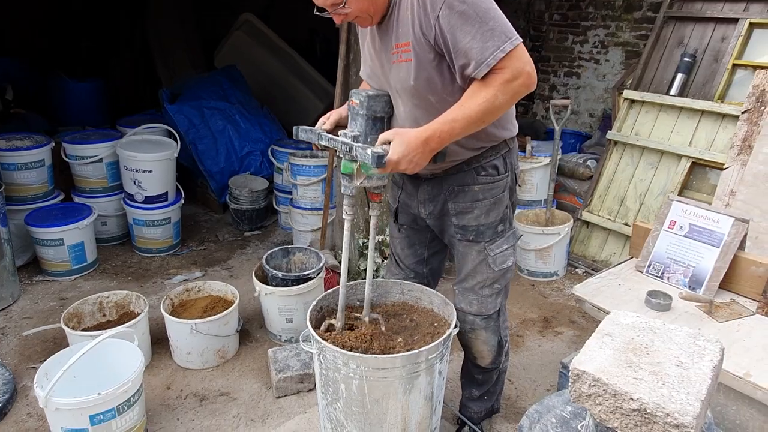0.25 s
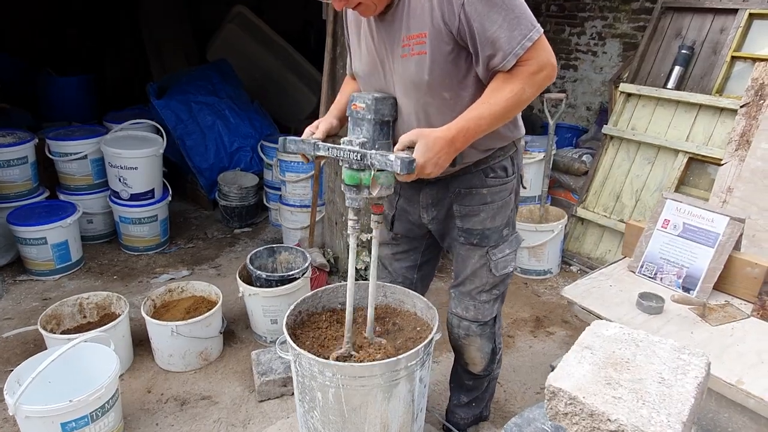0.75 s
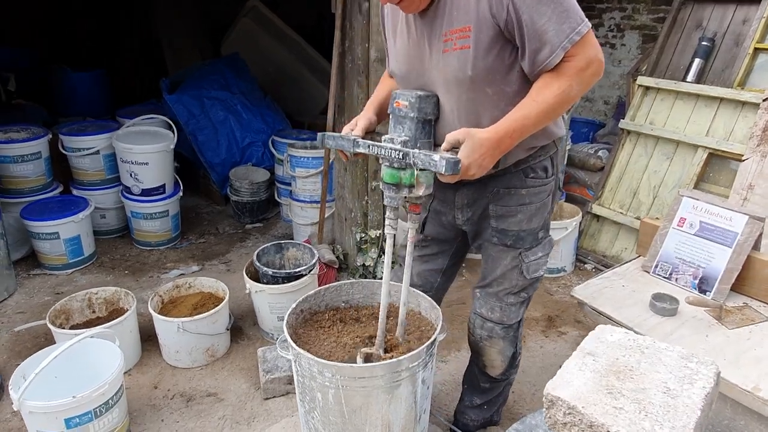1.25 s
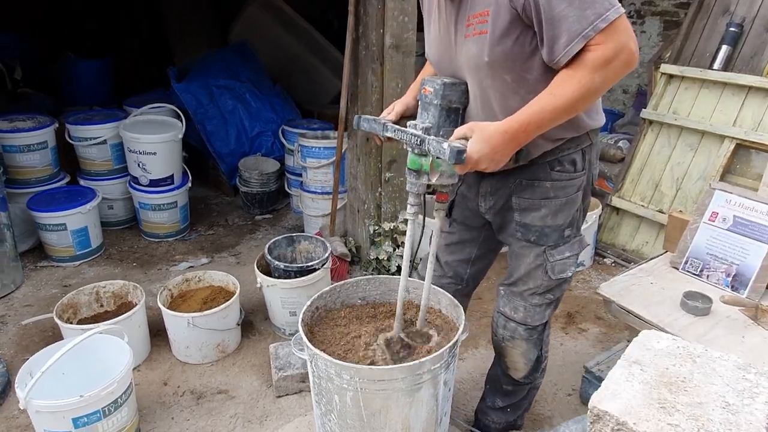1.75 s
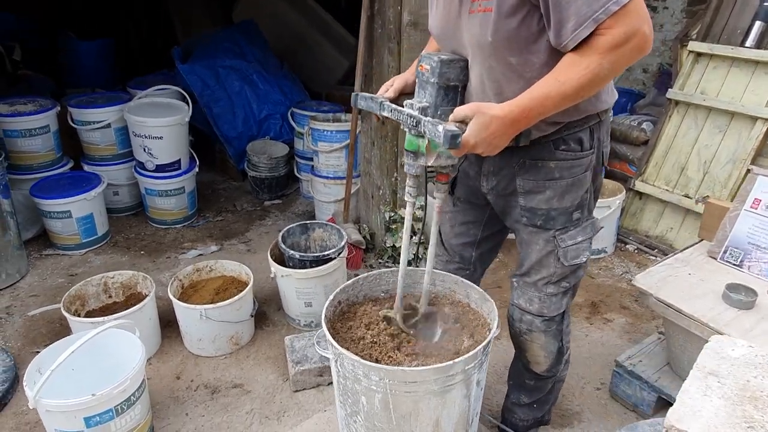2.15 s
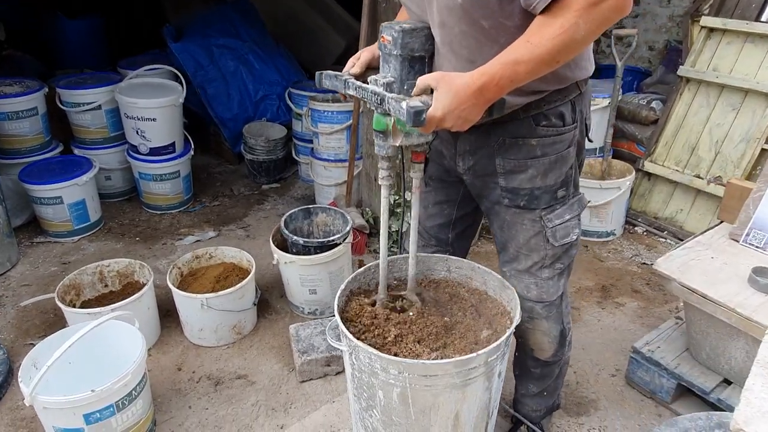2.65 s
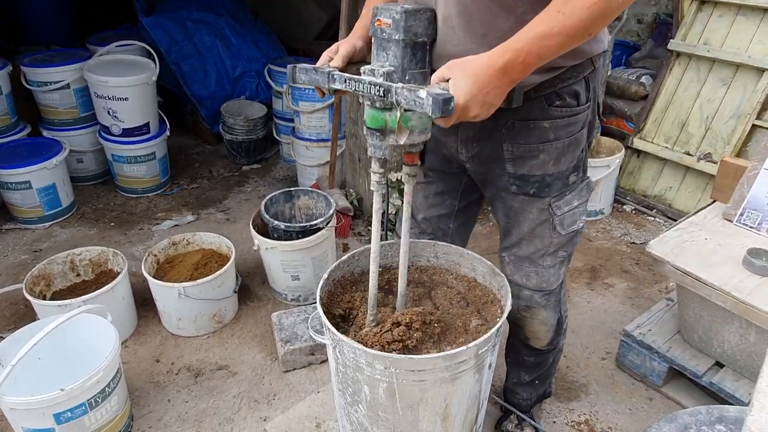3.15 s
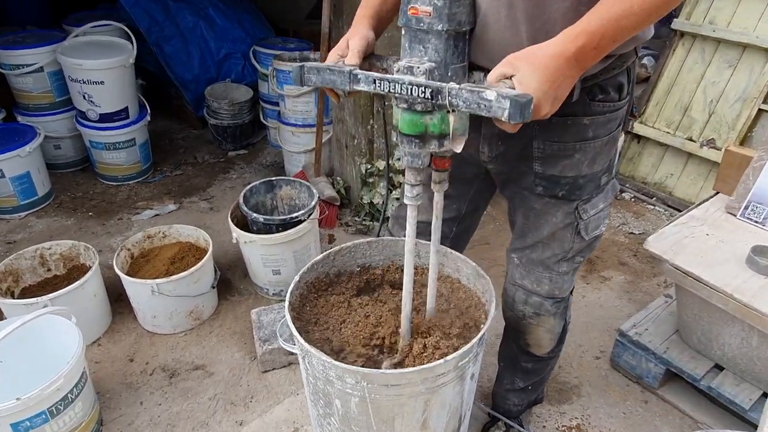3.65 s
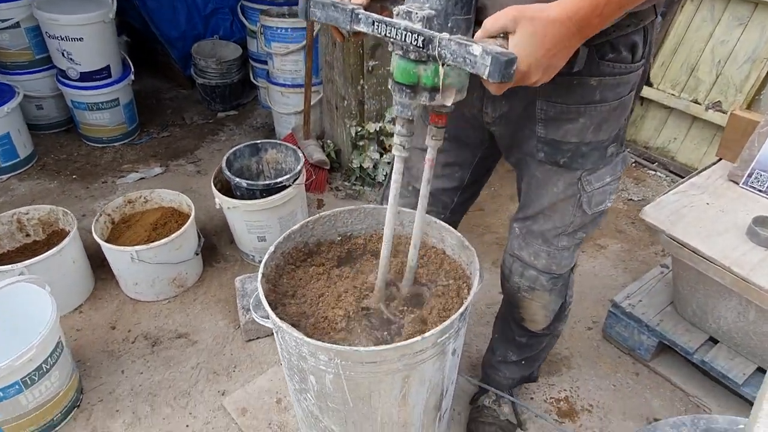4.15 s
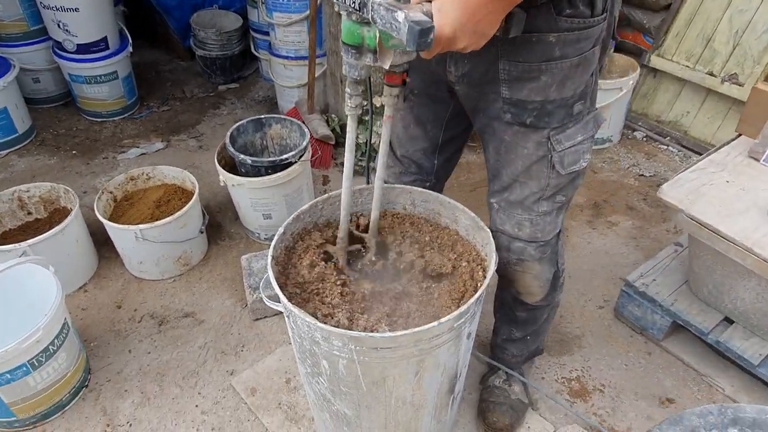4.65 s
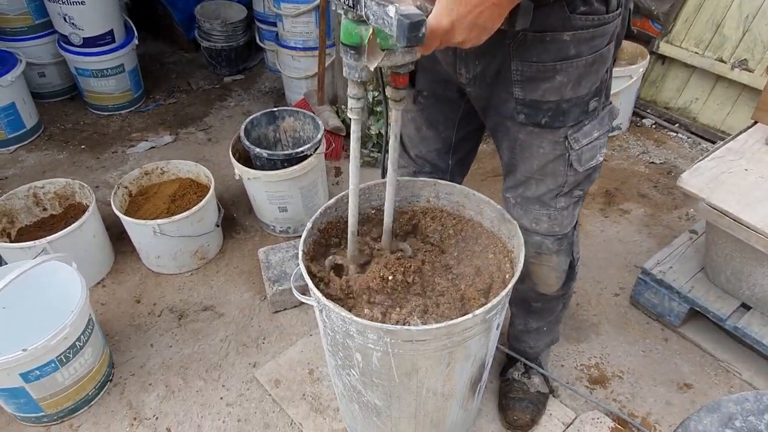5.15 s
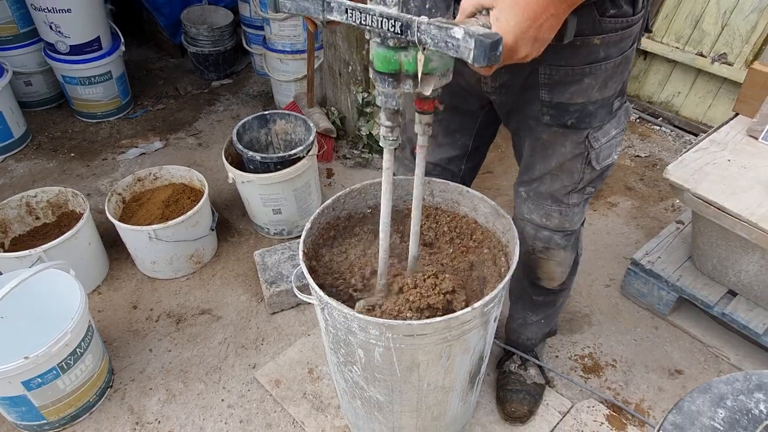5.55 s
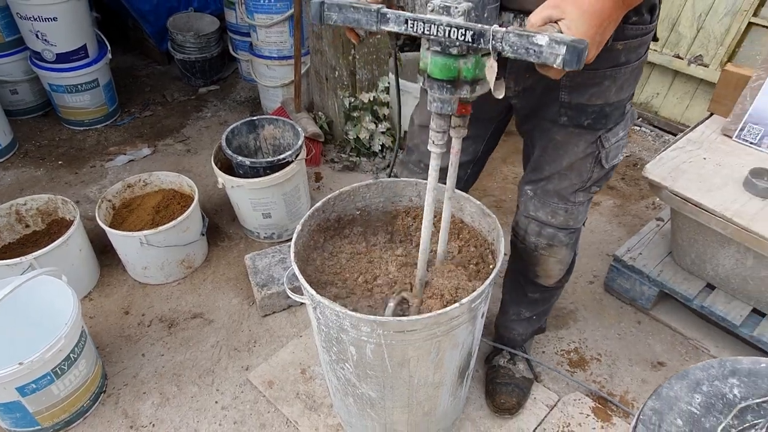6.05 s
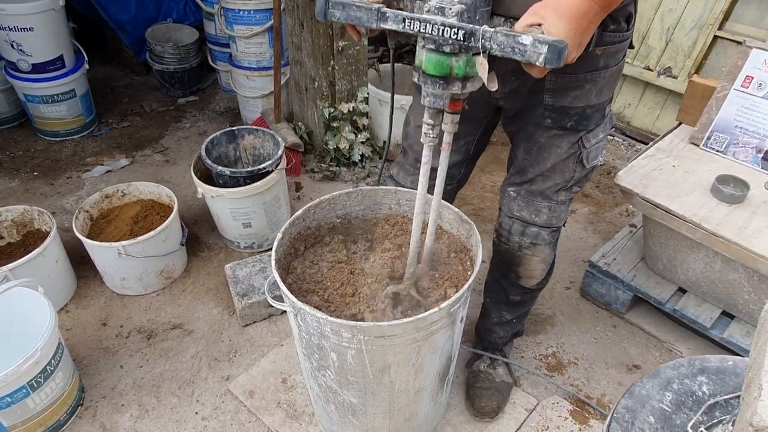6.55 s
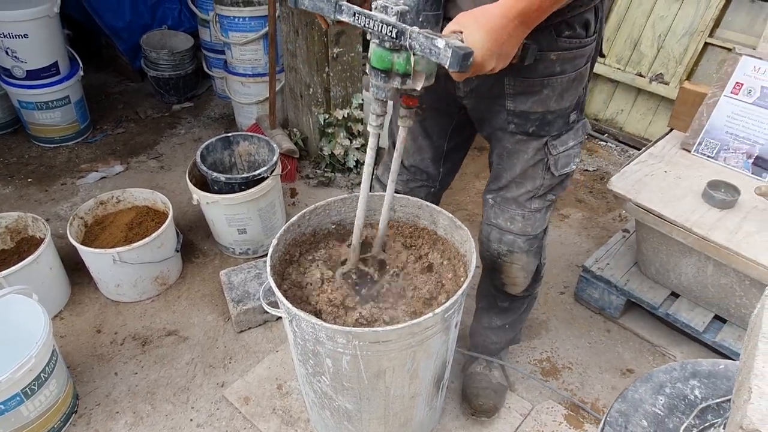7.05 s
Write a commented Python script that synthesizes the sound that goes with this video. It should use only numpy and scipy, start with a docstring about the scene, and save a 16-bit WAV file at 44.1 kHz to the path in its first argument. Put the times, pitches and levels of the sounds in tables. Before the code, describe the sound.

A powerful electric mixer is already running in a metal bin of stiff mortar, close and loud in stereo, with short outdoor reflections. At 0-1.1 s the motor holds a rough, buzzing gear whine around 1 kHz with stronger overtones, while paddles scrape the wall and stones crunch sharply; soft clods thump near 0.3 s. It steps up at about 1.2 s, and the whine swells until 2.3 s as it climbs again to a higher pitch by 2.5 s. Scrapes and crunches return at 2.7-3.7 s. The whine swells again at 3.3-4.8 s over low shoving rumble and wet churning. Gritty scraping and cracks crowd 4.4-5.3 s, with thumps near 5.0 and 5.3 s. A small final rise around 5.4 s settles into a steady whine, fan rush, grinding sand and hiss, with a last scrape at 7.2 s; it ends still running.

```python
"""Mortar mixer in a yard

A twin-paddle electric mixer works stiff mortar in a metal bin, heard in stereo with short echoes around it.
The motor speeds up in steps: its six-tooth pinion whines, fan and brushes rush, the mains make it buzz.
The paddles are led round the bin: on one side the whine swells, on the other they crush grit against
the wall, and in between they shove the wet mass along. Clods thump the bin."""
import sys
import numpy as np
from scipy import signal
from scipy.fft import rfft, irfft, next_fast_len
from scipy.io import wavfile
from scipy.ndimage import uniform_filter1d

SR = 44100
rng = np.random.default_rng(int(sys.argv[2]) if len(sys.argv) > 2 else 0)


def to_wav(s):
    """Save 16-bit WAV."""
    ch = np.atleast_2d(s).T  # columns
    pcm = np.round(np.clip(ch, -1, 1) * 32767)  # PCM
    wavfile.write(sys.argv[1], SR, pcm.astype(np.int16))


N = 321489
TIME = np.arange(N) / SR
FULL_SPEED = 225   # shaft turns per second


def from_db(db):
    """Decibels to amplitude."""
    return 10 ** (np.asarray(db) / 20)


def rms_one(x):
    """Scale to an rms of 1."""
    return x / np.sqrt(np.mean(x ** 2) + 1e-20)


def in_time(rows):
    """The columns of a curve, sample by sample."""
    seconds, *columns = np.transpose(rows)
    return [np.interp(TIME, seconds, column) for column in columns]


def at_hz(points, hz):
    """A spectrum read on a log-frequency axis."""
    f, value = np.transpose(points)
    return np.interp(np.log(hz + 1e-3), np.log(f), value)


def held(start, end, ramp_s):
    """Rise, hold and fall, from 0 to 1 and back."""
    return np.clip(np.minimum(TIME - start, end - TIME) / ramp_s, 0, 1)


def drift(rate):
    """Slow chance with spread 1: white noise smoothed by a double pole, faster for a higher rate."""
    # drawn at every 40th sample, after a run-in of 2000 draws
    pole = np.exp(-80 * np.pi * rate / SR)
    draws = rng.standard_normal(N // 40 + 2002)
    slow = signal.lfilter([1], [1, -2 * pole, pole * pole], draws)[2000:]
    return np.interp(np.arange(N) / 40, np.arange(len(slow)), rms_one(slow))


# Stereo width. Each row: frequency in Hz, side minus mid in dB.
WIDTH = [(60, -33), (110, -27), (200, -56.5), (380, -29), (700, -17), (1290, -8), (2380, -6), (4400, -3.5),
         (8120, -0.5), (15000, 1)]
# Stereo balance. Each row: frequency in Hz, left minus right in dB.
LEAN = [(60, 1), (110, -2.5), (200, -1.5), (380, -0.5), (700, -0.5), (1290, 0), (2380, -1), (4400, -2),
        (8120, -0.5), (15000, 2.5)]


def noise(colour, peaks=(), size=N):
    """Stereo noise of a given colour, narrow in the bass and wide in the treble; rms 1."""
    padded = next_fast_len(size)
    hz = np.arange(padded // 2 + 1) * SR / padded
    level_db = at_hz(colour, hz)
    for f, width, db in peaks:
        level_db = level_db + db / (1 + (2 * (hz - f) / width) ** 2)
    mid, side = rfft(rng.standard_normal((2, padded)))
    signs = np.array([[1], [-1]])
    pair = mid + signs * side * from_db(at_hz(WIDTH, hz))
    pair = pair * from_db(signs * at_hz(LEAN, hz) / 2)
    return rms_one(irfft(pair * from_db(level_db), padded)[:, :size])


def coloured(x, colour):
    """A sound passed through a frequency response."""
    padded = next_fast_len(N + SR // 10)
    hz = np.arange(padded // 2 + 1) * SR / padded
    return irfft(rfft(x, padded) * from_db(at_hz(colour, hz)), padded)[:, :N]


def yard(x):
    """Ground, bin and buckets send back three short echoes, different at each side."""
    out = x.copy()
    for channel in (0, 1):
        lags = (rng.uniform(0.001, 0.0085, 3) * SR).astype(int)
        for lag in lags:
            out[channel, lag:] += x[channel, :-lag] / 4
    return out


def grains(per_s, spread_db):
    """Random clicks of very uneven size and either sign."""
    born = rng.random(N) < per_s / SR
    size_db = spread_db * np.minimum(rng.exponential(1, N), 4)
    return born * from_db(size_db) * rng.choice([-1, 1], N)


def crackle(clicks, colour, t60, tail_db, tail_t60, count=6):
    """Each click lands on one of a few spots; each spot cracks in its own way and echoes in the bin."""
    age = TIME[:SR // 8]
    dealt = rng.integers(0, count, N)
    decay = from_db(-60 * age / t60) + from_db(tail_db - 60 * age / tail_t60)
    spots = [rms_one(noise(colour, size=len(age)) * decay) / np.sqrt(len(age)) for _ in range(count)]
    high_pass = signal.butter(2, 250, "high", fs=SR, output="sos")
    spots = signal.sosfilt(high_pass, spots)
    out = np.zeros((2, N))
    for k, spot in enumerate(spots):
        landed = (clicks * (dealt == k))[None]
        out += signal.oaconvolve(landed, spot, axes=1)[:, :N]
    return out


# Clods that thump the bin. Each row: start in seconds, level in dB before the mode gains, pitch in Hz.
THUMPS = [(0.251, -27.5, 600), (0.317, -28.5, 400), (2.995, -26, 1040), (4.993, -25, 1110),
          (5.015, -27, 256), (5.338, -21.5, 464)]
# Modes of the loaded bin. Each row: frequency in Hz, gain in dB, t60 in seconds.
BIN_MODES = [(214, 10, 0.097), (268, 8, 0.063), (447, 6, 0.037), (543, -13, 0.027), (850, 19, 0.02),
             (1154, 18, 0.033)]


def thumps():
    """Thrown clods set the damped bin ringing, most in the modes near their own pitch."""
    out = np.zeros(N)
    age = TIME[:SR // 8]
    contact = 1 - np.exp(-age / 0.0019)   # wet mortar lands softly
    for s, db, pitch_hz in THUMPS:
        start = int(s * SR)
        for hz, mode_db, t60 in BIN_MODES:
            strength_db = db + mode_db - 7 * abs(np.log2(hz / pitch_hz))   # 7 dB less per octave away
            ring = np.sin(2 * np.pi * (hz * age + rng.random()))
            out[start:start + len(age)] += contact * from_db(strength_db - 60 * age / t60) * ring
    return out


# The paddles shove the mass. Each row: start in seconds, end in seconds, rumble added in dB.
SHOVES = [(0.7, 1.197, -57), (1.75, 2.544, -46.5), (3.177, 3.854, -42), (4.248, 4.9, -44),
          (5.265, 6.25, -43), (6.55, 7.4, -52)]


def shoves():
    """Push of the paddles on the mass: a small steady part, raised during each shove."""
    push = from_db(-47)
    for start, end, db in SHOVES:
        push = push + from_db(db) * held(start, end, ramp_s=0.11)
    return push


# Friction of the sand on the paddles, of which only the swing about its mean counts.
# Each row: time in seconds, level in dB.
FRICTION = [(0.0, -30.5), (0.28, -35.5), (0.99, -33), (1.3, -38), (1.81, -38), (2.39, -30), (3.59, -27.5),
            (4.1, -27), (4.61, -26), (5.14, -31), (5.46, -26.5), (5.83, -23), (6.35, -24), (7.29, -24)]
# Colour of the rumble. Each row: frequency in Hz, level in dB per Hz.
RUMBLE = [(15, -35), (30, -18.5), (55, -7.5), (78, -4), (140, -12.5), (300, -10), (900, -60)]
# Colour of the wet churning. Each row: frequency in Hz, level in dB per Hz.
CHURN = [(90, -54), (150, -4.5), (200, 3.5), (290, -0.5), (470, -5), (590, 8), (720, -0.5), (900, -9.5),
         (1400, 3.5), (4000, -28)]
# Colour of crushed grit and grinding sand. Each row: frequency in Hz, level in dB per Hz.
GRIT = [(200, -57), (700, -9), (1400, -2.5), (2000, 1.5), (2800, 2), (3400, 1.5), (4400, -7.5),
        (6500, -16.5), (8500, -24), (16000, -27)]
# Colour of the sand's hiss. Each row: frequency in Hz, level in dB per Hz.
HISS = [(2500, -50), (5000, 6.5), (7000, 9.5), (8000, 0.5), (10500, 4.5), (12000, -4.5), (14500, -19),
        (15500, -40), (16500, 6.5)]
# levels at mean friction, and the share of its swing that each follows
HISS_DB, HISS_FOLLOWS = -31.5, 0.71
GRIND_DB, GRIND_FOLLOWS, LOAD_ON_GRIND = -32.5, 1.22, 0.1   # last: share of the load's swing
# churning at full speed, its growth with speed, and its change per dB of whine swell
CHURN_DB, CHURN_SPEED_POWER, CHURN_FOLLOWS = -28.5, 2.4, -0.26


def mortar(speed, turns, swell_db, push):
    """The geared-down paddles shove the mix in beats: rumble, wet churning, grinding sand and hiss."""
    friction_db, = in_time(FRICTION)
    friction_db = friction_db - friction_db.mean()
    load_db = 20 * np.log10(push / push.mean())
    beat = np.cos(2 * np.pi * (turns / 17 + 0.28 * drift(3.1)))   # one beat in 17 shaft turns

    rumble = push * from_db(0.5 * drift(10)) * noise(RUMBLE)

    churn_db = CHURN_DB + CHURN_FOLLOWS * swell_db + 1.2 * drift(39) + 1.0 * beat
    churn = from_db(churn_db) * (speed / FULL_SPEED) ** CHURN_SPEED_POWER * noise(CHURN)

    sand = grains(2500 * from_db(3 * beat + 2.7 * drift(20)), spread_db=2.5)
    grind_db = GRIND_DB + GRIND_FOLLOWS * friction_db + LOAD_ON_GRIND * load_db
    grind = from_db(grind_db) * rms_one(crackle(sand, GRIT, t60=0.018, tail_db=-9, tail_t60=0.28))

    angle = 2 * np.pi * turns
    chatter = 1 + 0.067 * np.cos(angle) + 0.11 * np.cos(2 * angle) + 0.14 * np.cos(3 * angle)
    hiss_db = HISS_DB + HISS_FOLLOWS * friction_db + 0.81 * drift(25) + 0.5 * beat
    hiss = from_db(hiss_db) * chatter * yard(noise(HISS))
    return rumble + churn + grind + hiss


# Paddles dragging on the wall. Each row: start in seconds, end in seconds, pressure in dB.
SCRAPES = [(0.0, 0.17, -27), (0.18, 1.255, -32.5), (0.967, 1.004, -29), (2.736, 2.953, -22.5),
           (3.0, 3.748, -30), (3.49, 3.564, -29), (4.363, 4.802, -27.5), (4.82, 4.963, -22.5),
           (5.013, 5.11, -22.5), (5.161, 5.263, -26), (7.235, 7.32, -19.5)]


def scrapes():
    """A paddle drags coarse grit along the wall: clumps of stick-slip cracks while the contact lasts."""
    pressure = sum(from_db(db) * held(start, end, ramp_s=0.016) for start, end, db in SCRAPES)
    cracks = rms_one(grains(700 * from_db(3.5 * drift(30)), spread_db=3.0)) * pressure
    return crackle(cracks, GRIT, t60=0.016, tail_db=-14, tail_t60=0.06)


def small_stones(per_s=6):
    """Lesser stones, caught at random while a paddle is on the wall: rows as for the larger ones."""
    draws = rng.random((100, 4))
    chance = per_s * N / SR / len(draws)
    stones = []
    for when, size, pitch, luck in draws:
        s = when * N / SR
        on_wall = any(start < s < end for start, end, _ in SCRAPES)
        if luck < chance and on_wall:
            level_db = -13.5 + 3 * (2 * size - 1)
            pitch_hz = 2310 * 2 ** (pitch - 0.5)   # within half an octave either way
            stones.append((s, level_db, pitch_hz, -42, 0.0051))
    return stones


# The larger stones crushed by a paddle. Each row: break in seconds, level in dB before BODY_DB,
# pitch in Hz, treble level in dB before EDGE_DB, crumbling time in seconds.
CRUNCHES = [(0.047, -11, 1920, -43, 0.01), (0.1324, -9.5, 1940, -42, 0.011),
            (0.252, -7.5, 2530, -35, 0.011), (0.3727, -12, 2160, -36, 0.011),
            (0.5387, -7.5, 1990, -45, 0.0087), (0.6474, -9.5, 1910, -35, 0.012),
            (0.7864, -7.5, 1970, -36, 0.013), (0.852, -7.5, 2160, -42, 0.014),
            (0.9313, -7, 2790, -38, 0.011), (0.9656, -1, 2680, -42, 0.014), (1.0266, -4, 2420, -36, 0.011),
            (1.0318, -12, 3030, -29, 0.011), (1.0395, -4.5, 3080, -41, 0.011),
            (1.0633, -10, 1940, -36, 0.011), (1.1368, -8, 1980, -37, 0.0084),
            (1.1422, -4, 3280, -38, 0.0057), (2.7329, -8, 2920, -34, 0.011), (2.7807, -9, 2090, -36, 0.011),
            (2.8157, -9, 2550, -39, 0.011), (2.8675, -6, 1920, -36, 0.012), (2.8944, -9, 1850, -33, 0.011),
            (2.9961, -5.5, 1990, -40, 0.011), (3.329, -15, 2530, -24.5, 0.014),
            (3.38, -11.5, 2690, -29, 0.011), (3.499, -6.5, 2520, -28, 0.011),
            (3.5518, -8, 2520, -32, 0.011), (3.702, -3, 2400, -28, 0.0085), (4.7189, -7, 3010, -24, 0.013),
            (4.765, -4.5, 2850, -22, 0.014), (4.845, -7, 3370, -32, 0.013),
            (4.9928, -7.5, 2520, -38, 0.012), (5.0754, -10, 2550, -38, 0.011),
            (5.1687, -7.5, 1910, -38, 0.011), (5.2112, -7, 1980, -30, 0.012),
            (5.788, -4.5, 2640, -35, 0.011), (5.8886, -8.5, 2310, -30, 0.011),
            (5.9394, -7.5, 1900, -32, 0.011), (6.0935, -8, 3510, -29, 0.0087)]
# Colour of a crack's bright edge. Each row: frequency in Hz, level in dB per Hz.
EDGE = [(3000, -8), (5000, 7), (8500, -3), (11000, -5), (16000, -6)]
BODY_DB, EDGE_DB = -7.5, 5   # gains on a stone's two levels


def crunches():
    """A trapped stone grates as the load builds, cracks at its own pitch, and crumbles in smaller cracks."""
    out = np.zeros((2, N))
    age = TIME[:SR // 8] - 0.012   # the grating is heard before the break
    after = np.maximum(age, 0)
    broken = age > 0
    for s, db, hz, treble_db, crumble_s in list(CRUNCHES) + small_stones():
        start = max(int((s + age[0]) * SR), 0)
        chipped = rng.random(len(age)) < 380 / SR
        chips = chipped * rng.uniform(0.22, 1.0, len(age)) * np.exp(-after / crumble_s) * broken
        chips[np.argmax(broken)] = 1   # the main crack
        energy = signal.lfilter([1], [1, -np.exp(-1 / (0.002 * SR))], chips ** 2)
        echo = from_db(-18.0 - 60 * after / 0.14) * broken   # the bin echoes briefly
        grating = 0.21 * np.exp(-abs(age) / 0.0044)   # just before and after the break
        force = np.sqrt(energy) + echo + grating
        body = from_db(BODY_DB + db) * noise(GRIT, [(hz, 700, 6)], size=len(age))
        edge = from_db(EDGE_DB + treble_db) * noise(EDGE, size=len(age))
        out[:, start:start + len(age)] += (force * (body + edge))[:, :N - start]
    return out


def mains_pulse(speed):
    """Torque ripple at 100 Hz: at low speed the controller chops the mains harder."""
    return np.cos(2 * np.pi * 100 * TIME) * (speed.min() / speed) ** 1.3


# Colour of the cooling air. Each row: frequency in Hz, level in dB per Hz.
AIR = [(100, -31), (250, -12.5), (480, -3.5), (620, 5), (900, 0.5), (1250, 2.5), (1650, -3.5), (2050, 3.5),
       (3000, 0), (3900, 1), (4500, -4), (6800, -15), (8000, -21.5), (16000, -18)]
# Air resonances of the motor housing. Each row: frequency in Hz, width in Hz, boost in dB.
HOUSING = [(1870, 110, 6.5), (1974, 63, 4), (2480, 47, 4.5), (2950, 83, 5), (6220, 31, 12), (6860, 79, 9)]


def fan(speed, turns):
    """Cooling air and its whistles grow with speed and flutter with the shaft and the mains."""
    angle = 2 * np.pi * turns
    flutter = 1 + 0.032 * mains_pulse(speed) + 0.0072 * np.cos(angle) + 0.057 * np.cos(2 * angle)
    level = from_db(-24 + 0.77 * drift(5.3)) * (speed / FULL_SPEED) ** 1.8
    return level * flutter * yard(noise(AIR, HOUSING))


# Relative strength of the brush lines. Each row: frequency at full speed in Hz, level in dB.
BRUSH = [(4300, -10), (6700, -20), (7600, 4), (9500, 6), (11000, 0), (13000, -2), (15500, -17)]


def brushes(speed, turns):
    """The brushes run over the same uneven commutator on every turn: a fine comb of high lines."""
    multiples, angle = np.arange(28, 71), np.linspace(0, 1, 2049)   # of the shaft rate; in turns
    offsets = rng.random((2, len(multiples), 1))   # other phases at each side
    gains = from_db(at_hz(BRUSH, multiples * FULL_SPEED))
    one_turn = gains @ np.cos(2 * np.pi * (multiples[:, None] * angle + offsets))
    position = (turns + 0.0017 * drift(26)) % 1
    buzz = np.array([np.interp(position, angle, side) for side in one_turn])
    return from_db(-39.5) * rms_one(buzz) * (speed / FULL_SPEED)


def tone(turns, multiple, waver_db, scatter, rough):
    """One motor line as a turning pointer: roughened by gear play, widened by shifting reflections."""
    play = 1 + rough * (drift(40) + 1j * drift(25))
    wave = np.exp(2j * np.pi * multiple * turns) * play / np.sqrt(1 + 2 * rough ** 2)
    width = scatter * from_db(at_hz(WIDTH, multiple * FULL_SPEED))
    side = width * (drift(5) / 2 + 1j * drift(1.95)) * np.array([[1], [-1]])
    return np.sqrt(2) * wave * (1 + side) * from_db(waver_db * drift(32))


# The paddles sweep one side of the bin and the whine swells. Each row: start in seconds, end in seconds,
# swell of the tooth tone in dB, of its double in dB, of its triple in dB.
SWEEPS = [(1.407, 2.316, 6.5, 0.5, 9), (3.303, 3.806, 2, 7.5, -2), (3.54, 4.436, 9, -6, 7.5),
          (4.254, 4.843, 8.5, 2, 5), (5.48, 6.17, 5.5, -4, -1), (6.227, 7.3, 7, -3, 3)]


def whine_swells():
    """Swell in dB of the tooth tone, its double and its triple during the sweeps."""
    return sum(np.outer(dbs, held(start, end, ramp_s=0.18)) for start, end, *dbs in SWEEPS)


# The motor, raised in steps and sagging a little under load. Each row: time in seconds, shaft turns per second.
SPEED = [(0.0, 161.1), (0.22, 158.7), (0.33, 161.1), (0.85, 159.5), (1.09, 162.4), (1.28, 179.3),
         (1.52, 180.4), (2.08, 178.4), (2.24, 191.1), (2.43, 211.9), (2.6, 216.4), (2.94, 211.0),
         (3.25, 209.8), (3.7, 212.1), (3.88, 214.0), (4.22, 213.0), (4.45, 210.1), (4.62, 212.0),
         (4.84, 217.2), (5.12, 213.0), (5.42, 223.3), (5.58, 224.4), (5.81, 223.1), (6.19, 225.6),
         (7.0, 224.2), (7.29, 222.2)]


def motor_speed():
    """Shaft turns per second, in straight lines between the steps."""
    return in_time(SPEED)[0]


# How strongly the gearbox radiates the tooth tones. Each row: frequency in Hz, gain in dB.
GEARBOX = [(960, -40), (1080, -33), (1270, -34), (1350, -33.5), (1800, -34.5), (1920, -29), (2030, -25.5),
           (2150, -27), (2350, -25.5), (2550, -32.5), (2700, -33.5), (2900, -39.5), (3250, -46.5),
           (3800, -36), (4050, -36.5)]
# Weaker lines. Each row: multiple of the shaft rate, level in dB at full speed before OVERTONE_DB.
OVERTONES = [(2.39, -46), (4.66, -46), (7, -45), (8, -43), (9, -35.5), (10, -39.5), (11, -37), (11.5, -40),
             (13, -36.5), (16, -45), (17, -45), (20, -50), (21.3, -50), (24, -48), (26, -46), (27, -45),
             (30, -42)]
TEETH = 6   # on the pinion
HUM_DB, HUM_SPEED_POWER = -38.5, 5.3   # shaft hum at full speed, and its growth with speed
# the weaker lines: gain between sweeps, share of the tooth tone's swell, growth with speed
OVERTONE_DB, OVERTONE_FOLLOWS, OVERTONE_SPEED_POWER = -2, 0.46, 2.45
# shake of the teeth in turns at steady speed, and extra turns per (turn per s per s)
BACKLASH_TURNS, BACKLASH_PER_ACCELERATION = 0.003, 0.00006


def gears(speed, turns, swells_db):
    """Tooth tones through the gearbox; the double throbs with the mains and the eccentric pinion."""
    first_db, second_db, third_db = swells_db
    relative_speed = speed / FULL_SPEED
    # the teeth rattle more while the speed changes
    acceleration = uniform_filter1d(abs(np.gradient(speed)) * SR, size=SR // 10)
    turns = turns + (BACKLASH_TURNS + BACKLASH_PER_ACCELERATION * acceleration) * drift(29)
    runout = np.exp(2j * np.pi * turns)
    # complex, so that the tone swells and lags at once
    throb = 1 + mains_pulse(speed) * (0.61 + 0.5j) + 0.057 / runout + 0.12 * runout

    hum = tone(turns, 0.99, waver_db=1.0, scatter=0.6, rough=0.041)
    hum = from_db(HUM_DB) * relative_speed ** HUM_SPEED_POWER * hum
    first = from_db(first_db) * tone(turns, TEETH, waver_db=1.9, scatter=0.8, rough=0.34)
    second = from_db(second_db) * tone(turns, 2 * TEETH, waver_db=0.66, scatter=0.95, rough=0.24) * throb
    third = from_db(third_db) * tone(turns, 3 * TEETH, waver_db=3.0, scatter=1.0, rough=0.032)
    whine = coloured(np.real(first + second + third), GEARBOX)

    weaker = sum(from_db(db) * tone(turns, multiple, waver_db=2.0, scatter=1.0, rough=0.69)
                 for multiple, db in OVERTONES)
    weaker_level = from_db(OVERTONE_DB + OVERTONE_FOLLOWS * first_db)
    weaker = weaker * weaker_level * relative_speed ** OVERTONE_SPEED_POWER
    return whine + np.real(hum + weaker)


def scene():
    """One shaft drives the motor and mix; sweeps trade churning for whine, shoves add rumble and grinding."""
    speed = motor_speed()
    turns = np.cumsum(speed) / SR
    swells_db = whine_swells()
    bin_sounds = thumps() + mortar(speed, turns, swells_db[0], shoves()) + scrapes() + crunches()
    motor = fan(speed, turns) + brushes(speed, turns) + gears(speed, turns, swells_db)
    return bin_sounds + motor


def record(dry):
    """The microphone signal is clipped at full scale, then cut steeply above 16 kHz."""
    low_pass = signal.ellip(12, 0.1, 90, 16000, fs=SR, output="sos")
    return signal.sosfilt(low_pass, np.clip(dry, -1, 1))


dry = scene()
out = record(dry)
to_wav(out)
```